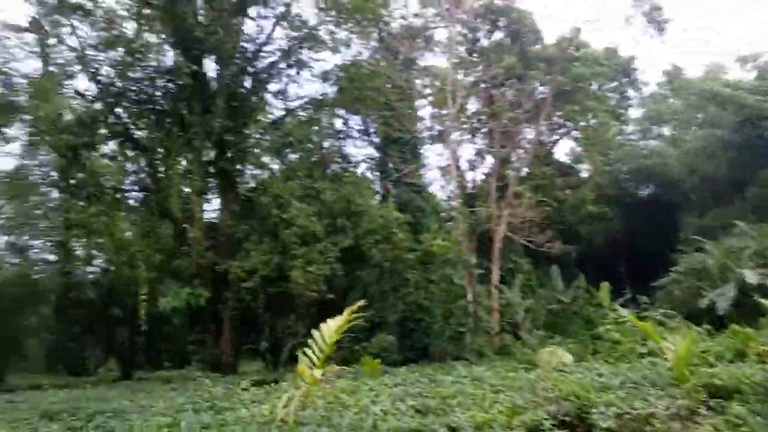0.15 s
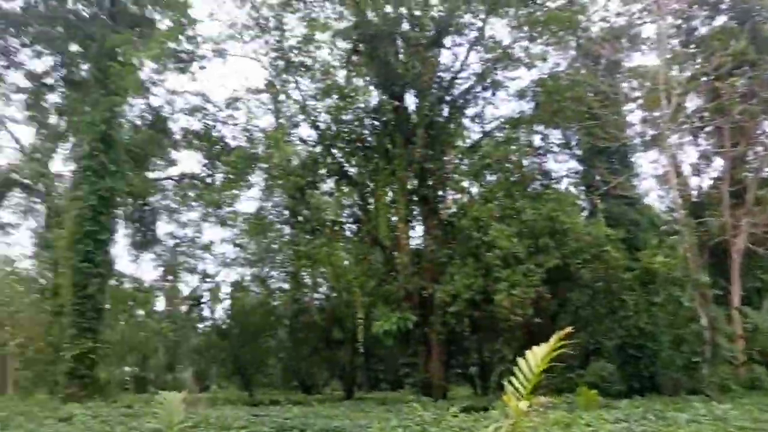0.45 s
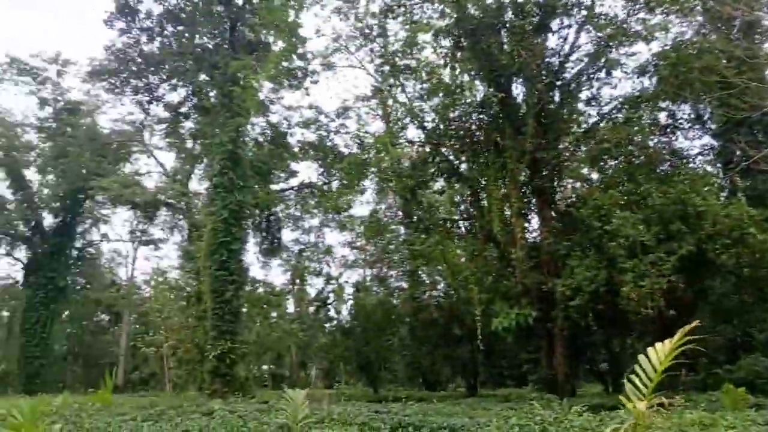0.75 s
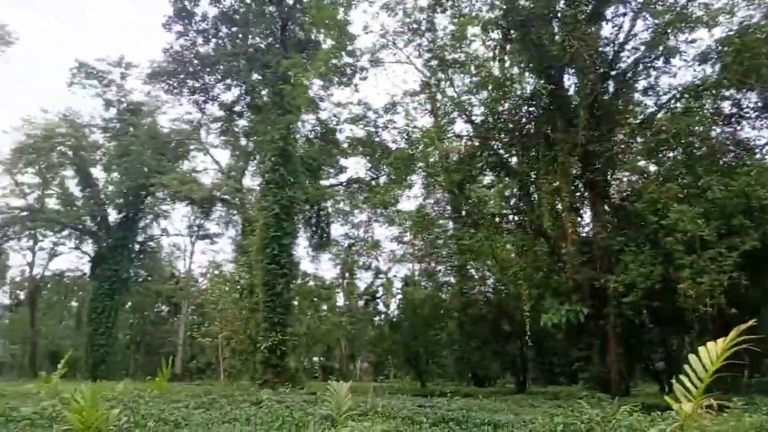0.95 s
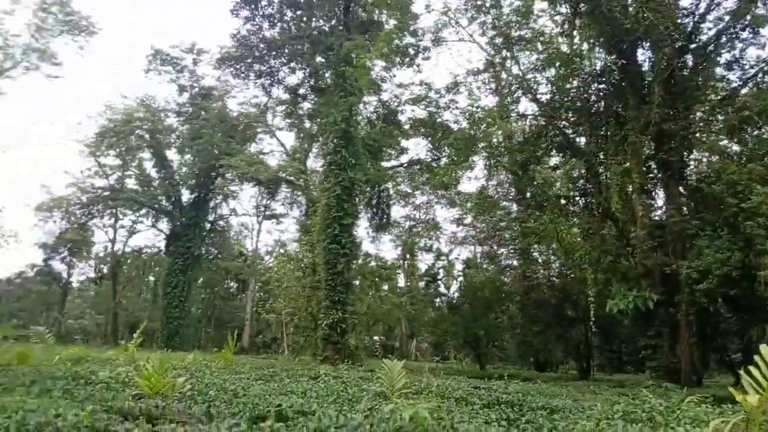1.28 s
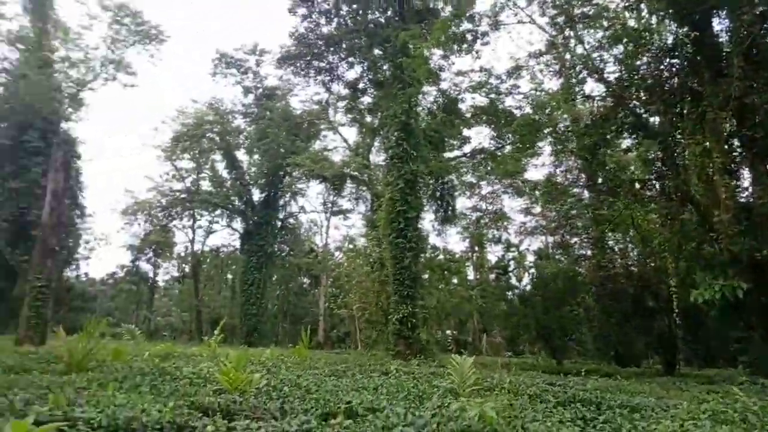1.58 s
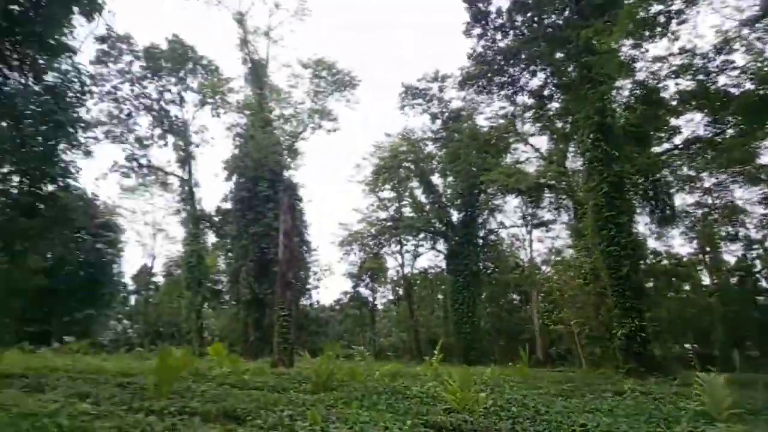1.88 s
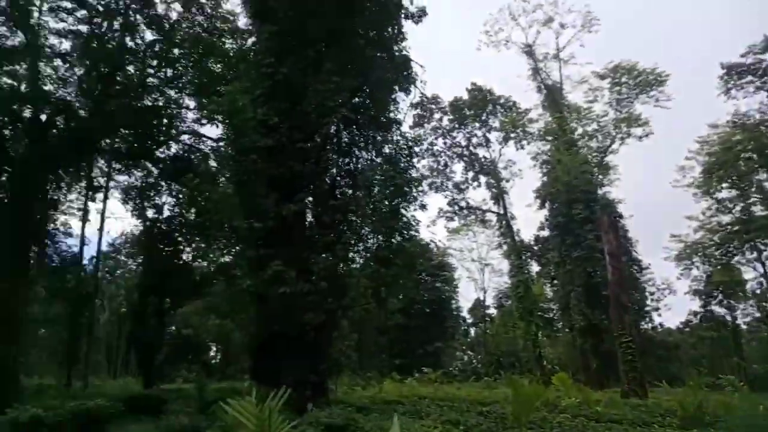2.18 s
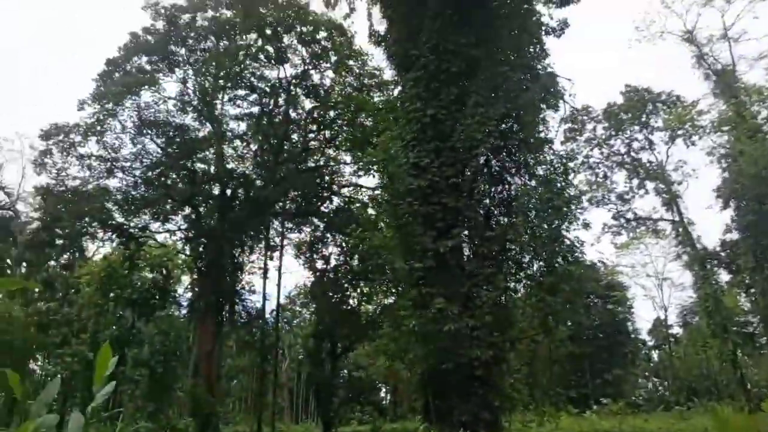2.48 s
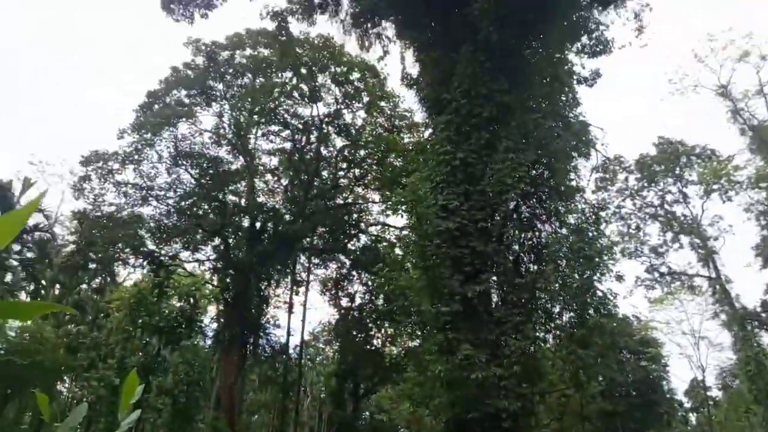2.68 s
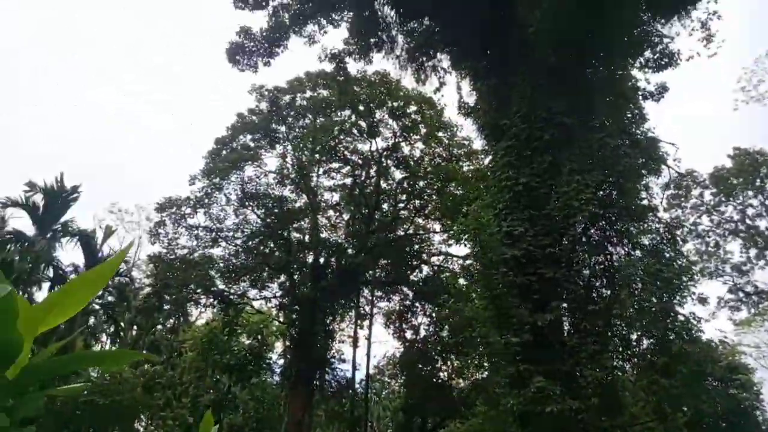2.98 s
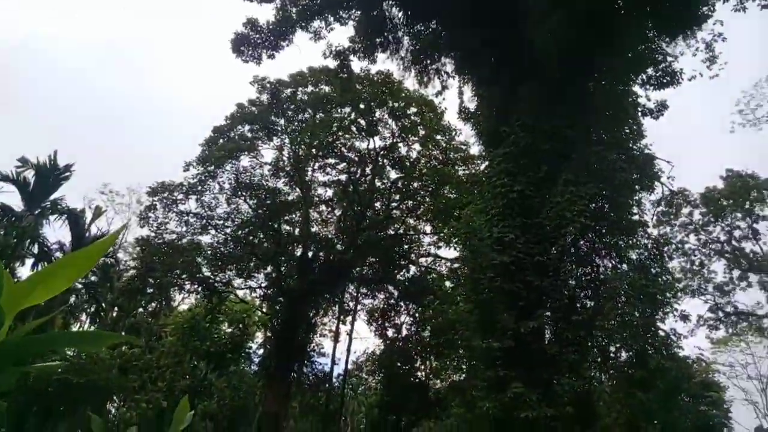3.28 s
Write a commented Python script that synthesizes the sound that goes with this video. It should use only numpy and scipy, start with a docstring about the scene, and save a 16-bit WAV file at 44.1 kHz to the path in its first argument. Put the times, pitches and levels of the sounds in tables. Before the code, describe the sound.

Busy bird chorus among trees, with raspy squawks, bright chirps, falling hoots and thin insect trills

```python
"""A garden full of birds

Two whistlers sing arched notes, now and then a note droops, and low birds hoot, often in falling triplets:
all are sines along pitch curves. A harsh caller rasps again and again: pulses and breath noise through
throat resonances. Insects trill high above as trains of gliding pulses, and a twig snaps once as a decaying
noise burst. Shaped noise with a wavering hum is the air and traffic; sparse echoes scatter from the trees."""
import sys
import numpy as np
from scipy import signal
from scipy.io import wavfile
from scipy.ndimage import uniform_filter1d

SR = 44100
rng = np.random.default_rng(int(sys.argv[2]) if len(sys.argv) > 2 else 0)


def store_wav(level_fs):
    """Save 16-bit WAV to argv[1]."""
    pcm = np.round(np.clip(np.atleast_2d(level_fs), -1, 1) * 32767)
    wavfile.write(sys.argv[1], SR, pcm.T.astype(np.int16))


N = 152145


def amp(db):
    """Decibel law: level in dB to amplitude gain."""
    return 10 ** (np.asarray(db) / 20)


def evened(x):
    """Power normalization: scales to rms 1."""
    return x / np.sqrt(np.mean(x ** 2) + 1e-20)


def read(points, hz):
    """Spectral interpolation: reads (frequency, value) points on a log frequency axis."""
    f, value = np.transpose(points)
    return np.interp(np.log(hz + 1), np.log(f + 1), value)


def add(mix, s, sound):
    """Superposition: mixes a sound in at time s [s]."""
    part = mix[max(round(s * SR), 0):][:len(sound)]
    part += sound[:len(part)]


def resonate(x, hz, width):
    """Resonance by heterodyne: shift hz to zero, smooth with one pole, shift back; gain 1 at hz."""
    turn = np.exp(2j * np.pi * np.cumsum(hz * np.ones(len(x))) / SR)
    r = np.exp(-np.pi * width / SR)
    return 2 * (turn * signal.lfilter([1 - r], [1, -r], x / turn)).real


def resonate_twice(x, hz, width):
    """Cascaded resonance: two equal resonators in series give steeper skirts."""
    return resonate(resonate(x, hz, width), hz, width)


def whistle(hz, edge_s):
    """Frequency modulation: a sine along a pitch curve, with soft ends and a fluttering level."""
    flutter_db = 3.2  # rms
    t = np.arange(len(hz)) / SR
    ends = np.sin(np.pi / 2 * np.clip(np.minimum(t, t[-1] - t) / edge_s, 0, 1)) ** 2
    noise = rng.standard_normal(len(hz))
    flutter = evened(uniform_filter1d(uniform_filter1d(noise, size=200), size=200))
    phase = 2 * np.pi * (np.cumsum(hz) / SR + rng.random())
    return np.sqrt(2) * ends * amp(flutter_db * flutter) * np.sin(phase)


def air():
    """Shaped noise: far chorus, leaves and traffic, patchy in time and pitch, with a narrow-band hum."""
    # Background spectrum: (frequency [Hz], relative density [dB])
    air_spectrum = [(30, -37), (70, 11), (110, 0.5), (228, -8.5), (587, -10.5), (1150, -9), (1930, -13),
                    (3390, -9), (4100, -12.5), (5670, -24.5), (6850, -10), (8050, -15), (8970, -10),
                    (10200, -28.5), (12300, -29), (15800, -20)]
    air_db, patch_db = -49, 1.6
    shimmer_hz, shimmer_db = 13000, 2.5  # the treble above shimmer_hz flickers
    hum_hz, hum_width_hz, hum_db = 124, 2.7, -64

    frames, hz = N // 256 + 5, np.fft.rfftfreq(1024, 1 / SR)
    real, imag, patches = rng.standard_normal((frames, 513, 3)).T
    patches = uniform_filter1d(uniform_filter1d(patches, size=10, axis=0), size=10, axis=1)
    quick = uniform_filter1d(rng.standard_normal(frames), size=3)
    slow = uniform_filter1d(rng.standard_normal(frames), size=16)
    flicker = evened(quick + 2 * slow)

    level_db = read(air_spectrum, hz)[:, None] + patch_db * evened(patches)
    level_db += (hz > shimmer_hz)[:, None] * shimmer_db * flicker
    z = (real + 1j * imag) * amp(level_db)
    noise = signal.istft(z, nperseg=1024, noverlap=768)[1][:N]
    # Noise through a narrow resonance wavers in level
    hum = resonate(rng.standard_normal(N), hum_hz, hum_width_hz)
    return amp(air_db) * evened(noise) + amp(hum_db) * evened(hum)


def trees(x):
    """Scattering: sparse echoes from trunks and leaves, each band decaying at its own rate."""
    # Decay by band: (frequency [Hz], time to fall by 60 dB [s])
    decay_times = [(1000, 0.6), (3000, 0.83), (6000, 0.82), (12000, 0.8)]
    taps = np.zeros(SR)
    at = np.arange(300, SR - 20, 20)
    # One echo of random sign in every 20 samples
    taps[at + rng.integers(0, 20, len(at))] = rng.choice([-1., 1.], len(at))
    hz, t, z = signal.stft(taps, SR, nperseg=256)
    decay = amp(-60 * t / read(decay_times, hz)[:, None])
    tail = signal.istft(z * decay, SR, nperseg=256)[1]
    return signal.fftconvolve(x, tail / np.linalg.norm(tail))[:N]


def insects():
    """Pulse-train stridulation: each trill repeats one short gliding pulse, a little uneven in level."""
    # One insect a row: (pulse rate [1/s], mid pitch [Hz], glide over a pulse [Hz], duty [0-1],
    # bouts (start [s], end [s], first level [dB], last level [dB]))
    trills = [(147, 10550, -1000, .6, [(0, .512, -61, -61), (.82, 1.94, -84, -59),
              (2.25, 3.302, -76, -58)]), (54.2, 8600, -200, .55, [(.01, .62, -58, -60),
              (2.865, 3.45, -62, -52)]), (29.7, 7050, -60, .65, [(.195, .88, -62, -57)]),
              (30, 6750, -60, .8, [(.9, 1.12, -50, -60)]),
              (22.93, 4800, -350, .25, [(2.384, 2.71, -51, -48), (3.29, 3.45, -52, -46)])]
    pulse_spread_db = 1.2
    out = np.zeros(N)
    for rate, hz, glide_hz, duty, bouts in trills:
        for start, end, first_db, last_db in bouts:
            t = np.arange(0, end - start, 1 / SR)
            # Runs 0 to 1 through each pulse, then rests at 1 (silence)
            u = np.minimum((t * rate % 1) / duty, 1)
            pulse_index = (t * rate).astype(int)
            size, turn = rng.standard_normal((400, 2))[pulse_index].T
            tone = np.sin(2 * np.pi * (np.cumsum(hz + glide_hz * (u - .5)) / SR + turn))
            # The fourth root makes most of the level change come early
            level = amp(first_db + (last_db - first_db) * np.sqrt(np.sqrt(t / t[-1])))
            pulses = 2 * np.sin(np.pi * u) * tone  # rms 1 within a pulse
            add(out, start, level * amp(pulse_spread_db * size) * pulses)
    return out


def twig():
    """Damped impact: one snap, a resonant noise burst that decays exponentially."""
    start_s, samples, decay_s = .624, 900, .012
    snap_db, snap_hz, width_hz = -39.5, 7370, 1500  # level ahead of the decay
    t = np.arange(samples) / SR
    snap = resonate_twice(rng.standard_normal(samples), snap_hz, width_hz)
    out = np.zeros(N)
    add(out, start_s, amp(snap_db) * evened(snap) * np.exp(-t / decay_s))
    return out


def hooters():
    """Downward pitch glide: short low hoots, single or in triplets, that weaken as they fall."""
    # Single hoots: (start [s], starting pitch [Hz], starting level [dB])
    single_hoots = [(0, 950, -56), (.700, 965, -56.5), (1.378, 989, -48.5), (1.844, 1145, -41.5),
                    (3.334, 1170, -42.5)]
    # Triplets: (start [s], starting level [dB], pitch scale [ratio])
    triplets = [(.114, -43, 0.99), (.830, -43.5, 1), (1.503, -41, 1), (2.197, -43.5, 1),
                (2.252, -44.5, .93), (2.891, -41, 0.98), (2.942, -52.5, .92)]
    # Notes of a triplet: (time after its start [s], starting pitch ahead of the scale [Hz])
    triplet_notes = [(0, 1354), (.068, 1195), (.142, 1216)]
    length_s, pitch_fall, level_fall_db = .034, .3, 4.5  # pitch fall as a share of the start

    hoots = list(single_hoots)
    for start, db, scale in triplets:
        hoots += [(start + after, hz * scale, db) for after, hz in triplet_notes]
    out = np.zeros(N)
    u = np.arange(0, 1, 1 / (length_s * SR))
    for at, hz, db in hoots:
        curve = hz * (1 - pitch_fall * u ** 1.51)
        add(out, at, amp(db - level_fall_db * u) * whistle(curve, edge_s=.015))
    return out


def whistlers():
    """Pure-tone song: arched and drooping pitch curves, with a level that depends on the pitch."""
    # Notes of the high and the low whistler: (top [s], level [dB], extra level of the rising leg [dB])
    high_arches, low_arches = [(.143, -49, -7), (.460, -49.5, 2.5), (.811, -48.5, 4.5), (1.142, -46, -1.5),
                               (1.478, -46.5, 0), (1.805, -50, -1), (2.149, -46.5, -13), (2.477, -45.5, -4),
                               (2.827, -47, -2), (3.173, -48, 0)], [(.123, -50, 5), (.283, -52.5, -5), (.568, -51, -16),
                                                    (.730, -51, -1.5), (1.028, -53.5, 1), (1.198, -51, -15),
                                                    (2.358, -56, -14), (3.138, -56.5, 1),
                                                    (3.321, -53.5, -20)]
    # Drooping notes: (start [s], level [dB], unused: a droop has no rising leg)
    droops = [(.885, -59, 0), (2.662, -46, 0)]
    # Pitch curves: (time from the top or the start [s], pitch [Hz])
    high_shape, low_shape, droop_shape = [(-.043, 2550), (-.022, 3700), (-.015, 4750), (-.008, 5300),
                                          (0, 5430), (.009, 5120), (0.029, 3620), (.059, 2420)], [(-.03, 2170), (-.013, 2870), (-.006, 4150),
                                                              (0, 4290), (.011, 3870), (0.024, 3100),
                                                              (0.042, 2310)], [(0, 6950), (.032, 6550),
                                                                                 (.058, 5700)]
    # Voice response, added to the note levels: (pitch [Hz], level [dB])
    voice = [(2200, -2), (2900, 2), (3600, 6), (4200, 5), (4800, -1), (5400, 2.5), (6900, 0.5)]

    out = np.zeros(N)
    for notes, shape in ((high_arches, high_shape), (low_arches, low_shape), (droops, droop_shape)):
        s, f = np.transpose(shape)
        t = np.arange(s[0], s[-1], 1 / SR)
        curve = uniform_filter1d(np.interp(t, s, f), size=200, mode="nearest")
        for at, db, rise_db in notes:
            # The extra level fades out over the last 12 ms ahead of the top
            colour_db = read(voice, curve) + rise_db * np.clip(-t / 0.012, 0, 1)
            add(out, at + s[0], amp(db + colour_db) * whistle(curve, edge_s=.005))
    return out


def rasps():
    """Source-filter voice: uneven pulses and breath through throat resonances, with a hissing treble."""
    # Calls: (start [s], length ahead of the fall [s], level [dB], treble re level [dB],
    # throat pitch scale [ratio], beak resonance ahead of the mouth's shift [Hz], its gain [dB])
    calls = [(0.093, 0.071, -50, -15, 0.81, 2360, -3), (1.137, 0.053, -53, 2.5, 1.08, 3440, -7),
             (1.266, 0.035, -34.5, -10.5, 0.99, 3070, 5.5), (1.386, 0.081, -31.5, -13, 1.014, 2550, -0.5),
             (1.58, 0.094, -32.5, -10, 1.01, 2630, -1), (1.798, 0.099, -32, -14, 1.028, 2540, -1),
             (2.028, 0.099, -31.5, -13, 1.006, 2670, -9.5), (2.256, 0.11, -35.5, -15, 1, 2465, -0.5),
             (2.477, 0.1, -35, -10, 1.007, 2520, -2), (2.702, 0.11, -36, -9, 1, 2520, 1),
             (2.942, 0.11, -37, -11, 0.97, 2380, 0.5), (3.162, 0.14, -41.5, -14, 0.98, 2380, -8)]
    # Throat resonances ahead of scale and shift: (frequency [Hz], width of one pass [Hz], gain [dB])
    throat = [(1890, 780, -11.5), (2167, 376, 1), (2850, 1520, -14.5)]
    # Treble resonances ahead of the shift: (frequency [Hz], width of one pass [Hz], gain [dB])
    treble = [(6100, 600, 0), (7100, 900, 1), (8300, 900, -4)]
    rise_s, fall_s = .022, .03  # the fall is by e squared in fall_s
    pulses_hz, jitter, breath = 152, .16, .55  # jitter: rms of the log rate; breath: share of the drive
    beak_width_hz, top_hz = 300, 9200

    out = np.zeros(N)
    for at, length, db, treble_db, scale, beak_hz, beak_db in calls:
        t = np.arange(0, length + 4 * fall_s, 1 / SR)
        wobble = evened(uniform_filter1d(rng.standard_normal(len(t)), size=150))
        turns = np.cumsum(pulses_hz * np.exp(jitter * wobble)) / SR
        # One impulse per whole turn, of uneven level
        pulses = np.diff(np.floor(turns), prepend=0) * amp(1.46 * rng.standard_normal(len(t)))
        puffs = (0.25 + np.sin(np.pi * turns) ** 2) * rng.standard_normal(len(t))
        drive = (1 - breath) * evened(pulses) + breath * evened(puffs)

        # The opening mouth raises all resonances, which also wobble with the pulse rate
        mouth_open = np.sin(np.pi * np.minimum(t / t[-1], 1))
        shift = 0.9547 + 0.043 * mouth_open + 0.025 * wobble
        tract = [(f * scale, w, g) for f, w, g in throat] + [(beak_hz, beak_width_hz, beak_db)]
        low = sum(amp(g) * resonate_twice(drive, f * shift, w) for f, w, g in tract)
        high = sum(amp(g) * resonate_twice(puffs, f * shift, w) for f, w, g in treble)
        hiss = amp(treble_db) * np.sqrt(abs(mouth_open)) * evened(high)

        envelope = np.minimum(t / rise_s, 1) * np.exp(-np.maximum(t - length, 0) / fall_s * 2)
        add(out, at, amp(db) * envelope * (evened(low) + hiss))
    return signal.sosfilt(signal.butter(8, top_hz, fs=SR, output="sos"), out)


def scene():
    """Superposition of direct sound, scattered sound and background air."""
    # Echo levels re direct: of the song, of the rasps, and of the insects and twig
    song_wet_db, rasp_wet_db, insect_wet_db = -2, -3.5, -10
    song = hooters() + whistlers()
    harsh = rasps()
    small = insects() + twig()
    wet = trees(amp(song_wet_db) * song + amp(insect_wet_db) * small)
    wet += amp(rasp_wet_db) * trees(harsh)
    return (song + harsh + small + wet + air())[None]


def record(dry):
    """Band limiting: the small microphone loses the deep bass, then a steep low-pass ends the treble."""
    mic_low_hz, edge_hz = 67, 15550
    bass_cut = signal.butter(3, mic_low_hz, "high", fs=SR, output="sos")
    band_limit = signal.firwin(511, edge_hz, window=("kaiser", 9), fs=SR)
    return signal.oaconvolve(signal.sosfilt(bass_cut, dry), band_limit[None], "same")


dry = scene()
out = record(dry)
store_wav(out)
```